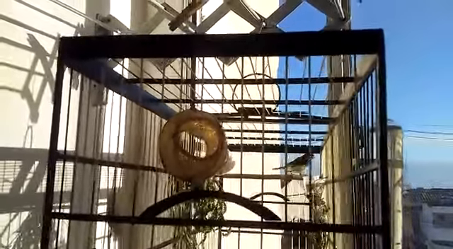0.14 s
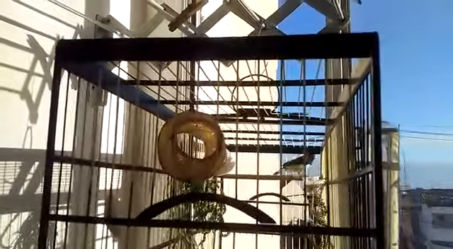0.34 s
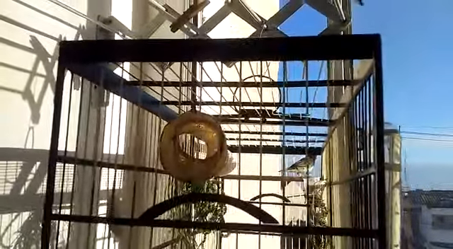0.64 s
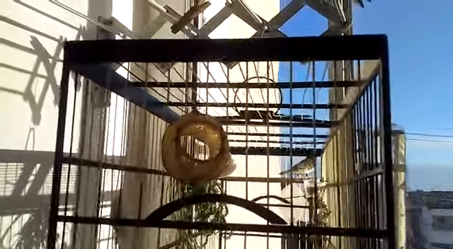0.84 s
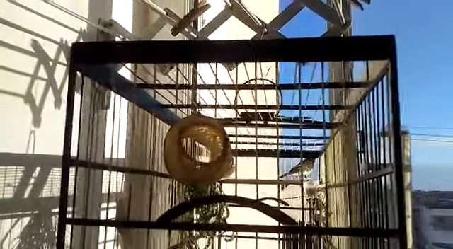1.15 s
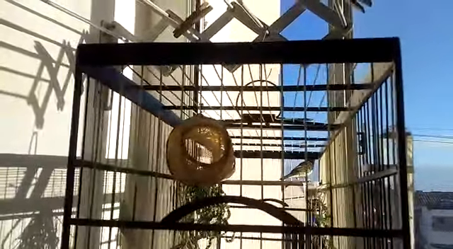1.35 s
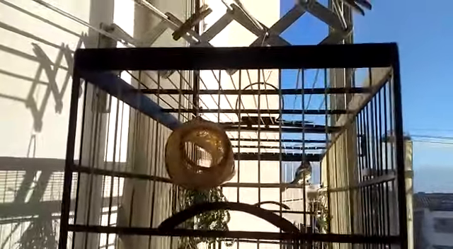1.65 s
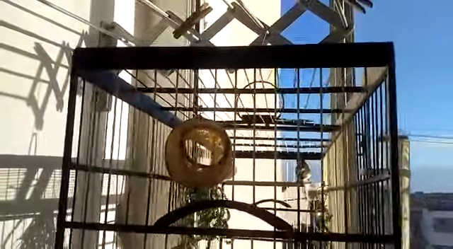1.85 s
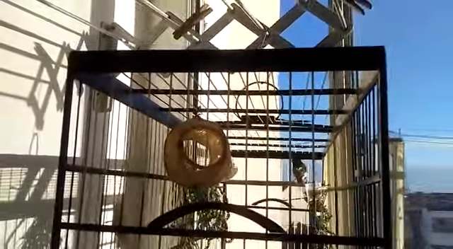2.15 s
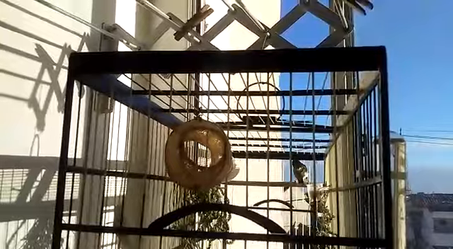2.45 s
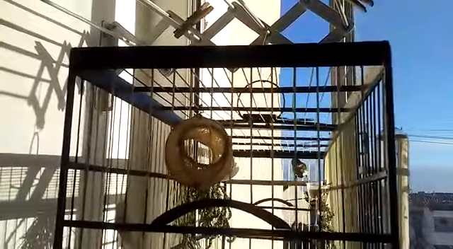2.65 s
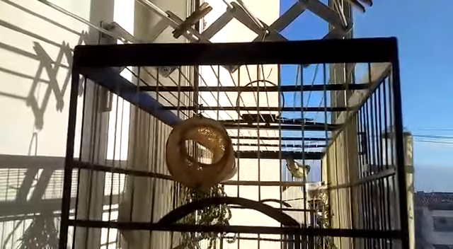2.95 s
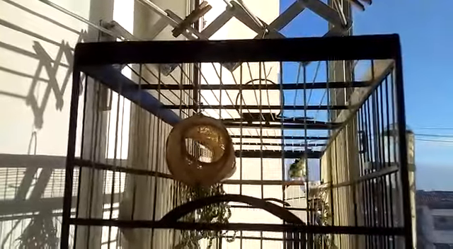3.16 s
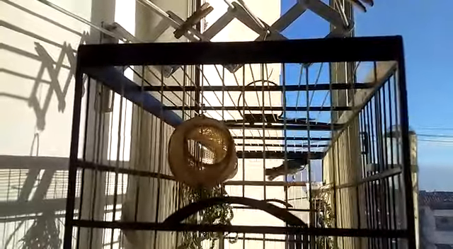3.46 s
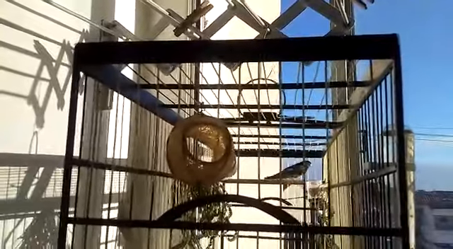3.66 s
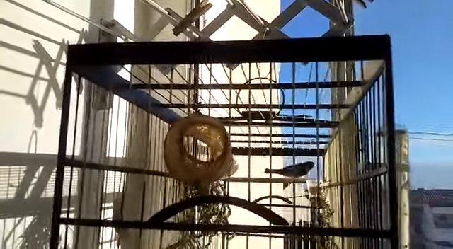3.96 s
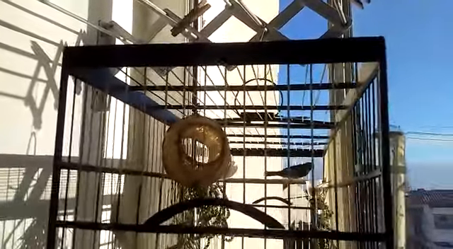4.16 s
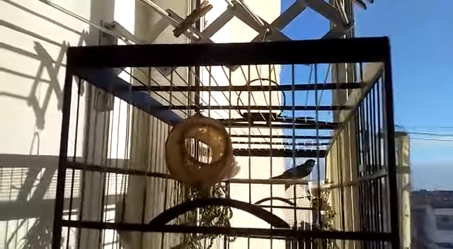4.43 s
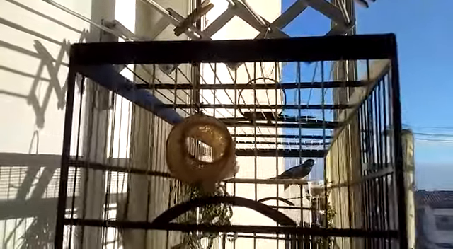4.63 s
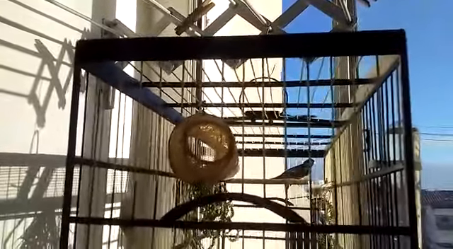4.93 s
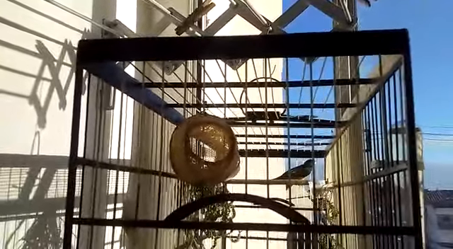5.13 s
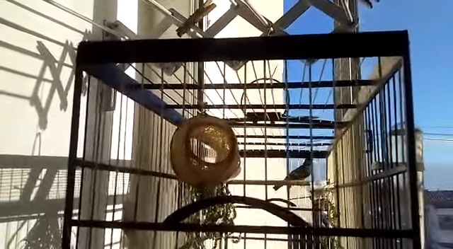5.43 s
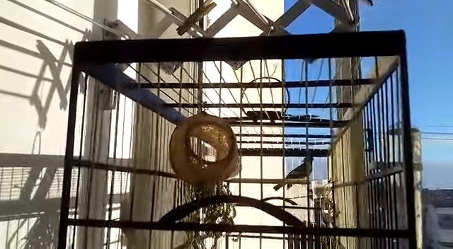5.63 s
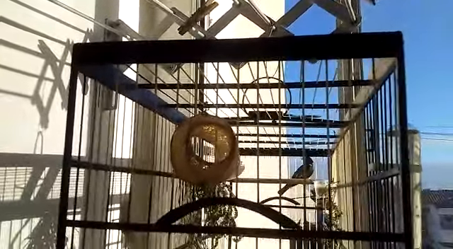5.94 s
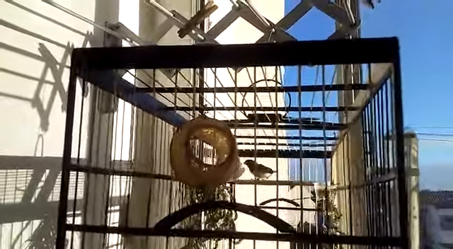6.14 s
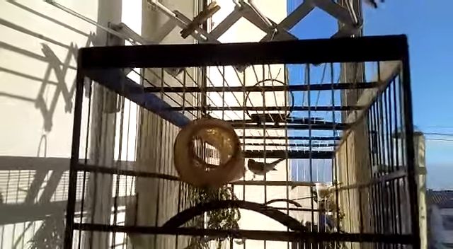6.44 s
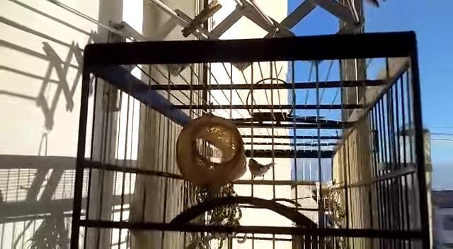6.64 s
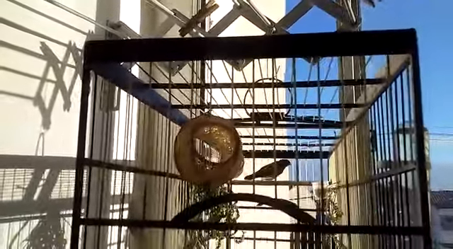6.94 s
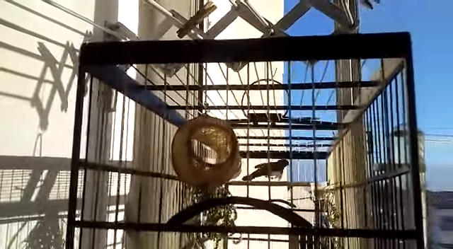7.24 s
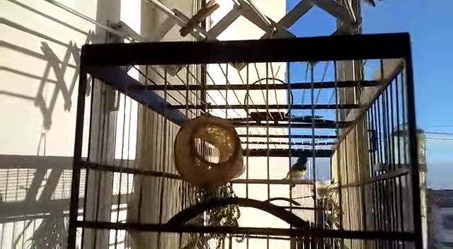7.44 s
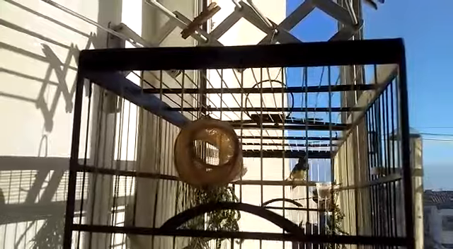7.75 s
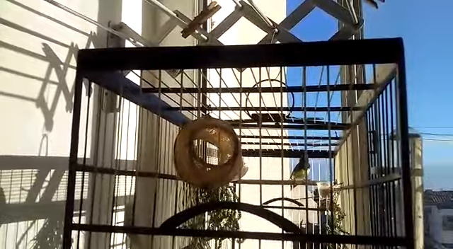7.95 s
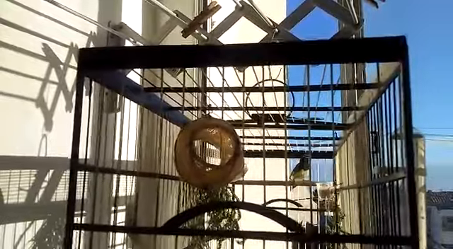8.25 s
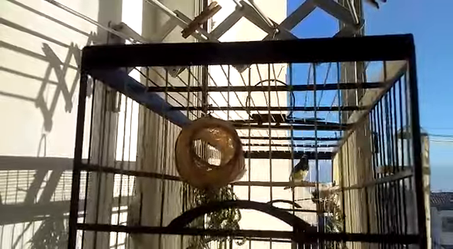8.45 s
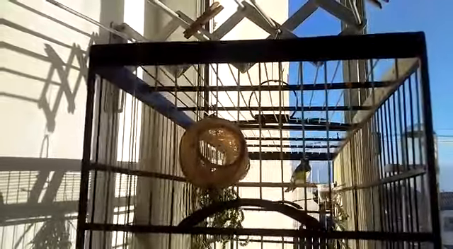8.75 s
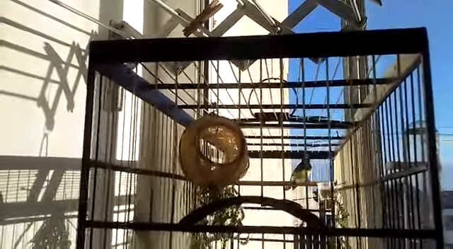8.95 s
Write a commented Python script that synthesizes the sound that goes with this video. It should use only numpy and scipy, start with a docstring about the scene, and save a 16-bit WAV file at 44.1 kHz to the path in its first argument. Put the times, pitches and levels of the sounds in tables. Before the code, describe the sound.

A small caged bird sings two loud, high, buzzy whistled phrases close by, and a distant bird answers over low town rumble.

```python
"""Caged bird on a town balcony.

A small bird sings two loud, close phrases with its syrinx: buzzes that clear into falling whistles,
the second phrase ending in a rasp and three tumbling cascades. A far bird answers, echoing off houses.
Behind them: town rumble and traffic, a machine's hum and whine, a motor revving, dull knocks and
three hoarse woofs. Claws and beak tick on the cage wire."""
import sys
import numpy as np
from scipy import signal
from scipy.fft import rfft, irfft, next_fast_len
from scipy.io import wavfile
from scipy.ndimage import uniform_filter1d, minimum_filter1d

SR = 44100
rng = np.random.default_rng(int(sys.argv[2]) if len(sys.argv) > 2 else 0)


def pcm_store(signal):
    """Save signal as 16-bit PCM."""
    levels = np.round(np.clip(np.atleast_2d(signal), -1, 1) * 32767)
    wavfile.write(sys.argv[1], SR, levels.astype(np.int16).T)


N = 400869
TIME_S = np.arange(N) / SR
EDGE_HZ = 15750

# Slur kinds: length_s, buzz_end_s, glide_start_s, glide_end_s, swell_at_s, attack_s, release_s,
# from_hz, to_hz, buzz_centre_hz, buzz_depth_hz, buzz_rate_hz
SOFT_SLUR = (.184, .06, .06, .17, .115, 0.029, .022, 4410, 3830, 4130, 820, 94)
LOW_SLUR = (0.19, .063, .055, .184, .11, 0.018, 0.023, 4520, 3750, 4360, 740, 110)
HIGH_SLUR = (0.19, 0.078, .05, .178, 0.074, 0.016, 0.02, 5040, 4360, 5470, 680, 134)
RASP = (.18, .058, 0.059, 0.12, 0.049, 0.025, 0.055, 4600, 4360, 4710, 1330, 95.5)
THIN_SLUR = (0.19, .07, 0.066, 0.11, 0.072, .014, 0.031, 4700, 5500, 5520, 650, 136)
SHORT_LOW_SLUR = (.16, .06, .04, .095, 0.0736, .014, 0.041, 5100, 3790, 4330, 250, 110)
SHORT_HIGH_SLUR = (0.12, .03, 0.011, 0.055, 0.052, 0.015, 0.052, 5150, 4630, 5060, 230, 137)
# Run kinds, one note a row: start_s, length_s, crest_at_s, loudest_at_s, first_hz, crest_hz, last_hz,
# first_db, loudest_db, buzz_depth_hz
CASCADE = [(0, .072, .02, 0.054, 6075, 7125, 5500, -17, -1, 199),
           (0.068, .027, .014, 0.01695, 4166, 4760, 4515, -15.5, -3, 257),
           (.092, .073, .017, .02, 3500, 4030, 2975, -17.5, -8, 50)]
STEEP_CASCADE = [(0, 0.057, 0.00196, 0.047, 8200, 8270, 5600, -3, 9, 150),
                 (.06, .04, 0.0042, 0.013, 4780, 4900, 4140, 3, 5.5, 450),
                 (.092, .08, .012, 0.012, 3470, 3594, 2850, -15, 0.96, 150)]
WARBLE = [(0, 0.068, 0.046, 0.035, 2845, 3090, 2950, -3, 4.5, 170),
          (.06, 0.072, .02, .02, 3940, 4083, 3924, -2, 7.5, 70),
          (.13, .04, 0.0016, .005, 3800, 3850, 3100, -2, 0, 150)]
# Reverb decay: freq_hz, t60_s
BALCONY_T60 = [(300, 0.57), (3500, 0.36), (6000, 0.43), (14000, 0.253)]
STREET_T60 = [(300, 1), (3500, 1.0), (6000, 1), (10000, .6)]


def gain_of(db):
    """Decibels to amplitude."""
    return 10 ** (np.asarray(db) / 20)


def unit_rms(x):
    """Scale to rms 1."""
    return x / np.sqrt(np.mean(x ** 2) + 1e-20)


def ease(u):
    """Smooth step over u = 0..1."""
    return np.sin(np.pi / 2 * np.clip(u, 0, 1)) ** 2


def at_freq(points, hz):
    """Interpolate a table over log frequency."""
    freq_hz, value = np.transpose(points)
    return np.interp(np.log(hz + 1), np.log(freq_hz + 1), value)


def over_time(points):
    """Interpolate a table over the scene's time."""
    return np.interp(TIME_S, *np.transpose(points))


def add(mix, start_s, sound):
    """Mix a sound in at start_s."""
    part = mix[max(0, round(start_s * SR)):][:len(sound)]
    part += sound[:len(part)]


def coloured(x, spectrum):
    """Filter by rows of freq_hz, gain_db; rms 1."""
    size = next_fast_len(len(x))
    gain = gain_of(at_freq(spectrum, np.fft.rfftfreq(size, 1 / SR)))
    return unit_rms(irfft(rfft(x, size) * gain, size)[:len(x)])


def noise(size, spectrum):
    """Coloured noise; rms 1."""
    return coloured(rng.standard_normal(size), spectrum)


def filtered(x, kind, hz, order):
    """Butterworth filter."""
    return signal.sosfilt(signal.butter(order, hz, kind, fs=SR, output="sos"), x)


def drift(size, rate_hz):
    """Smooth random wander; rms about 1."""
    position = np.arange(size) * rate_hz / SR
    return np.interp(position, np.arange(8192), rng.standard_normal(8192)) * np.sqrt(3 / 2)


def narrow_noise(hz, width_hz):
    """Noise band round a steady or moving frequency; rms about 1."""
    envelope = drift(N, width_hz) + 1j * drift(N, width_hz)
    return (envelope * np.exp(2j * np.pi * np.cumsum(hz * np.ones(N)) / SR)).real


def reverb(x, t60_table, rise_s):
    """Sparse reflections of random sign that build up, then die band by band."""
    taps = rng.choice([-1., 1.], SR) * (rng.random(SR) < .1)
    hz, t, bands = signal.stft(taps, SR, nperseg=256)
    decay = gain_of(-60 * t / at_freq(t60_table, hz)[:, None])
    tail = signal.istft(bands * decay, SR, nperseg=256)[1]
    tail *= 1 - np.exp(-(np.arange(len(tail)) / SR / rise_s) ** 2)
    return signal.oaconvolve(x, tail / np.linalg.norm(tail))[:N]


def wash(level_db=-50):
    """Even background noise with broad bands of hiss."""
    spectrum = [(15, -42.5), (25, -7), (64, -4.5), (199, -18.5), (240, -17), (322, -25), (349, -22),
                (496, -26), (805, -27), (1080, -31), (1380, -31.5), (3830, -40), (5160, -38.5), (7310, -44),
                (15500, -48)]  # town noise: freq_hz, gain_db
    hiss_bands = [(850, 300, 1), (1831, 570, 2.5), (6190, 900, 4.5), (9500, 2100, 4)]  # spectral humps: centre_hz, width_hz, boost_db
    hz = np.geomspace(20, 20000, 300)
    hiss_db = sum(db * np.exp(-2 * ((hz - centre) / width) ** 2) for centre, width, db in hiss_bands)
    colour_db = at_freq(spectrum, hz) + hiss_db
    return noise(N, np.c_[hz, colour_db]) * gain_of(level_db + .38 * drift(N, 9.1))


def rumble(trim_db=-2, lumps_db=2, boom_trim_db=-3):
    """Lumpy low noise that swells into brief booms."""
    levels = [(0, -46.5), (1.5, -40.5), (2.0, -49), (2.6, -62), (3.1, -44.5), (3.9, -57.5), (4.6, -48),
              (6.5, -43.5), (7.4, -35.5), (7.9, -36.5), (8.6, -54.5), (9.09, -41)]  # rumble contour: time_s, level_db
    booms = [(0.872, 0.12, -45), (1.68, 0.13, -38.5), (4.821, 0.12, -32.5), (5.34, 0.16, -40.5),
             (6.748, 0.065, -36)]  # low swells: centre_s, length_s, level_db
    low = noise(N, [(22, -28), (42, -7.5), (65, 8.5), (100, -12), (200, -25), (600, -57)])
    swells = sum(gain_of(db) * np.exp(-(2 * (TIME_S - s) / length_s) ** 2) for s, length_s, db in booms)
    lumps = gain_of(over_time(levels) + trim_db + lumps_db * drift(N, 16))
    return low * (lumps + gain_of(boom_trim_db) * swells)


def traffic(trim_db=-5, patches_db=3):
    """Swells of traffic that come and go band by band."""
    levels = [(0, -65.5), (3.7, -68.5), (3.95, -60), (4.5, -59), (5.2, -68.5), (5.8, -69), (6.7, -60),
              (7.3, -60.5), (8, -60), (9.09, -57.5)]  # traffic contour: time_s, level_db
    bands = [(620, -2.5), (780, .5), (980, 0), (1300, -7)]
    roar = sum(narrow_noise(hz, hz / 2) * gain_of(db + patches_db * drift(N, 12)) for hz, db in bands)
    return roar * gain_of(over_time(levels) + trim_db)


def town():
    """Wash, rumble and traffic; the small microphone loses the deepest bass."""
    return filtered(wash() + rumble() + traffic(), "highpass", 36, order=6)


def machine_hum(trim_db=-2, waver_hz=2.5, waver_db=1.8):
    """Low machine tones that waver in pitch and level."""
    tones = [(59.2, -57.5), (177.6, -64), (242.2, -66), (355.3, -63), (414.5, -65.5)]  # hum lines: freq_hz, level_db
    out = np.zeros(N)
    for hz, db in tones:
        phase = 2 * np.pi * np.cumsum(hz + waver_hz * drift(N, 20)) / SR
        out += np.sqrt(2) * gain_of(db + trim_db + waver_db * drift(N, 9)) * np.sin(phase)
    return out


def machine_whine(trim_db=-2, whistle_db=-74):
    """The machine's restless, fuzzy whine and faint steady whistle."""
    levels = [(0.0, -73), (0.35, -54), (0.58, -71), (1.27, -50), (1.34, -64), (2.05, -62), (2.08, -53.5),
              (2.33, -75), (2.91, -58.5), (3.69, -72), (3.82, -52), (4.05, -67), (5.14, -56.5),
              (5.26, -74.5), (5.85, -57), (5.95, -74), (6.02, -63), (9.09, -66)]  # whine contour: time_s, level_db
    whine = narrow_noise(808, 45) * gain_of(over_time(levels) + trim_db)
    return whine + gain_of(whistle_db) * narrow_noise(1836, 40)


def far_motor(trim_db=-1):
    """A motor speeds up once: a rising band of noise."""
    rev = [(3.721, 780, -78), (3.81, 830, -68), (3.901, 1045, -63), (3.96, 1235, -64), (4.04, 1220, -61.5),
           (4.201, 1245, -70), (4.351, 1200, -87)]  # rev contour: time_s, pitch_hz, level_db
    time_s, pitch_hz, level_db = np.transpose(rev)
    envelope = gain_of(np.interp(TIME_S, time_s, level_db, left=-120, right=-120) + trim_db)
    return narrow_noise(np.interp(TIME_S, time_s, pitch_hz), 42) * envelope


def street_knocks(t60_s=.14, trim_db=-4):
    """Dull knocks, each one broad resonance, with a short echo."""
    knocks = [(0.321, -45.5, 1380), (0.323, -39.5, 305), (1.17, -49, 2020), (3.955, -44.5, 980)]  # impacts: start_s, level_db, resonance_hz
    out, t = np.zeros(N), np.arange(8192) / SR
    for start_s, db, hz in knocks:
        ring = noise(len(t), [(hz / 2, -12), (hz, 0), (hz * 1.3, -18), (15000, -38)])
        add(out, start_s, gain_of(db + trim_db - 60 * t / t60_s) * ring)
    return .8 * out + reverb(out, BALCONY_T60, rise_s=.025)


def far_dog(hoarseness=.75, street_db=-8):
    """A big dog: breath noise and vocal pulses on a pitch arch, treble lost on the way."""
    woofs = [(3.147, 0.084, -37, 123.6), (3.577, 0.091, -39.5, 118.3), (3.969, 0.073, -44, 112.7)]  # barks: start_s, length_s, level_db, nominal_pitch_hz
    muzzle = [(80, -34.5), (170, 1.5), (230, 5), (320, -3), (440, -1), (560, -23), (750, -26), (1200, -55),
              (4000, -80)]  # bark spectrum: freq_hz, gain_db
    out = np.zeros(N)
    for start_s, length_s, db, hz in woofs:
        swell = np.sin(np.linspace(0, np.pi, int(length_s * SR)))
        phase = 2 * np.pi * np.cumsum(hz * (.73 + .197 * swell)) / SR
        pulses = sum(np.cos(k * phase) for k in range(1, 9))
        voice = (1 - hoarseness) * coloured(pulses, muzzle) + hoarseness * noise(len(swell), muzzle)
        add(out, start_s, gain_of(db) * unit_rms(voice * swell))
    return out + gain_of(street_db) * reverb(out, STREET_T60, rise_s=.0098)


def cage_ticks(t60_s=.073, trim_db=-3, ring_db=-16, ring_t60_s=.09, balcony_db=-8):
    """Claws and beak tap the cage; the wire rings faintly."""
    taps = [(3.464, -43, 14000), (6.0607, -31, 14000), (6.3, -45, 15000), (6.8844, -38, 5580),
            (6.9379, -38, 13000), (7.002, -40, 8960), (7.3603, -37, 7000)]  # taps on the wire: start_s, level_db, lowpass_hz
    wire = [(1180, -49.5), (2000, -20), (2820, -4), (3340, -13), (4400, 2), (6470, -0.5), (7230, -6),
            (8290, -4), (15500, -2)]  # wire spectrum: freq_hz, gain_db
    out, t = np.zeros(N), np.arange(4096) / SR
    decay = gain_of(-60 * t / t60_s) + gain_of(ring_db - 60 * t / ring_t60_s)
    for start_s, db, lowpass_hz in taps:
        tick = filtered(noise(len(t), wire), "lowpass", lowpass_hz, order=2) * decay
        add(out, start_s, gain_of(db + trim_db) * tick / abs(tick).max())
    return out + gain_of(balcony_db) * reverb(out, BALCONY_T60, rise_s=.008)


def syrinx(pitch_hz, level_db, depth_hz, rate_hz, air_db=-28, jitter=.0028, partial_step_db=-15):
    """A nearly pure whistle; in a buzz both sides of the syrinx swing in pitch and beat together."""
    overtones = [(6000, -47.5), (8000, -47.5), (10000, -50.5), (11500, -34), (14000, -28), (16000, -32)]  # overtone strength: freq_hz, gain_db
    # Rushing air: freq_hz, gain_db
    air_spectrum = [(2300, -38), (3300, 1.5), (6300, 7), (7400, -2.5), (9300, 2.5), (10600, -5.5),
                    (13300, -4.5), (15500, -17.5)]
    size = len(pitch_hz)
    cycle = 2 * np.pi * np.cumsum(rate_hz * (1 + .12 * drift(size, 200))) / SR
    buzzing = depth_hz / (depth_hz + 300)
    tone = np.zeros(size)
    for side_gain, lag in ((1, 0), (.59 * buzzing, np.pi / 2)):
        swing = .62 * np.sin(cycle - lag) + .15 * np.sin(2 * (cycle - lag)) + .25 * drift(size, 1100)
        hz = pitch_hz * (1 + jitter * drift(size, 900)) + depth_hz * swing
        phase = 2 * np.pi * np.cumsum(hz) / SR
        tone += side_gain * np.sin(phase)
        for k in range(2, 5):
            partial_db = at_freq(overtones, k * hz) + partial_step_db * (k - 2.5)
            tone += side_gain * gain_of(partial_db) * (k * hz < SR / 2) * np.sin(k * phase)
    # The harder the buzz is driven, the more air rushes through.
    tone += gain_of(air_db + .2 * level_db) * buzzing * noise(size, air_spectrum)
    throb = 1 - .85 * buzzing * np.cos(cycle)
    return np.sqrt(2) * tone * throb * gain_of(level_db)


def slur(kind, buzz_db, whistle_db, pitch_ratio, onset_s=.011, clearing_s=.016, swell_s=.018):
    """A buzz that clears into a gliding whistle."""
    (length_s, buzz_end_s, glide_start_s, glide_end_s, swell_at_s, attack_s, release_s,
     from_hz, to_hz, centre_hz, depth_hz, rate_hz) = kind
    t = np.arange(0, length_s, 1 / SR)
    buzzing = ease(.5 + (buzz_end_s - t) / clearing_s)
    swing_hz = depth_hz * ease(t / onset_s) * buzzing
    glide_hz = from_hz + (to_hz - from_hz) * ease((t - glide_start_s) / (glide_end_s - glide_start_s))
    glide_hz *= 1 + .007 * drift(len(t), 110)
    pitch_hz = pitch_ratio * (glide_hz + (centre_hz - glide_hz) * buzzing)
    db = buzz_db + (whistle_db - buzz_db) * ease(.5 + (t - swell_at_s) / swell_s)
    db -= 4.5 * np.exp(-((t - swell_at_s) / .007) ** 2)  # the voice catches
    envelope = np.minimum(t / attack_s, 1) * ease((length_s - t) / release_s)
    return envelope * syrinx(pitch_hz, db, swing_hz, rate_hz)


def arched_note(note, level_db, pitch_ratio, rate_hz, sink_db=-9.5, fade_s=.0036, fall_skew=.78):
    """One lightly buzzing note of a run: up to its crest and down again."""
    length_s, crest_at_s, loudest_at_s, first_hz, crest_hz, last_hz, first_db, loudest_db, depth_hz = note
    t = np.arange(0, length_s, 1 / SR)
    to_climb = np.maximum(1 - t / crest_at_s, 0) ** 2
    fallen = ease(np.maximum((t - crest_at_s) / (length_s - crest_at_s), 0) ** fall_skew)
    hz = crest_hz + (first_hz - crest_hz) * to_climb + (last_hz - crest_hz) * fallen
    db = level_db + first_db + (loudest_db - first_db) * ease(t / loudest_at_s) ** 2
    db += sink_db * np.maximum(t - loudest_at_s, 0) / (length_s - loudest_at_s)
    envelope = ease(np.minimum(t, length_s - t) / fade_s)
    return envelope * syrinx(pitch_ratio * hz, db, depth_hz, rate_hz, air_db=-20.5)


def sing(slurs, runs):
    """Syllables strung into phrases; so small a throat radiates little below its lowest note."""
    out = np.zeros(N)
    for start_s, *settings in slurs:
        add(out, start_s, slur(*settings))
    for start_s, kind, *settings in runs:
        for offset_s, *note in kind:
            add(out, start_s + offset_s, arched_note(note, *settings))
    return filtered(out, "highpass", 2800, order=12)


def distant_bird():
    """The answer, heard mostly off the house fronts, its overtones lost on the way."""
    slurs = [(0.0, THIN_SLUR, -63.5, -80, 1.08), (.5, THIN_SLUR, -67, -72, .96),
             (1.0, THIN_SLUR, -67, -76, .9), (1.22, THIN_SLUR, -70, -69, .9),
             (1.48, SHORT_LOW_SLUR, -57, -64, 0.85), (3.72, LOW_SLUR, -56.5, -54.5, 0.94),
             (4.125, SHORT_LOW_SLUR, -50, -44, 0.98), (4.32, SHORT_HIGH_SLUR, -40.5, -38.5, 1.0),
             (4.812, THIN_SLUR, -41.5, -38.5, 1.0)]  # syllables: start_s, kind, buzz_db, whistle_db, pitch_ratio
    runs = [(4.47, WARBLE, -47.5, 0.98, 69), (4.67, WARBLE, -47, 1.0, 69.6),
            (4.99, STEEP_CASCADE, -45, 1.0, 169.6), (5.19, STEEP_CASCADE, -44.5, 1.01, 164.4)]  # note runs: start_s, kind, level_db, pitch_ratio, buzz_rate_hz
    song = filtered(sing(slurs, runs), "lowpass", 8500, order=4)
    return .16 * song + reverb(song, STREET_T60, rise_s=.016)


def caged_bird(balcony_db=-9, street_db=-29):
    """The near song, reflected by walls, balcony and street."""
    slurs = [(1.697, SOFT_SLUR, -18, -10, 1), (2.102, LOW_SLUR, -13, -8.5, 0.99),
             (2.361, HIGH_SLUR, -11, -6.5, 0.98), (7.428, SOFT_SLUR, -20, -12.5, .98),
             (7.824, LOW_SLUR, -12, -8, 0.98), (8.068, HIGH_SLUR, -8.5, -3.5, 0.99),
             (8.311, RASP, -12.5, -5, 0.99)]  # syllables: start_s, kind, buzz_db, whistle_db, pitch_ratio
    runs = [(8.491, CASCADE, 0.5, .99, 168.8), (8.695, CASCADE, -0.5, 0.99, 171),
            (8.903, CASCADE, -2, 1.017, 170)]  # note runs: start_s, kind, level_db, pitch_ratio, buzz_rate_hz
    walls = [(.0023, 0.24), (.0041, -0.22), (.0078, 0.39), (0.0117, 0.26), (0.0178, -.2), (.029, 0.21)]  # near reflections: delay_s, gain
    song = sing(slurs, runs)
    near = song.copy()
    for delay_s, gain in walls:
        add(near, delay_s, gain * song)
    balcony = gain_of(balcony_db) * reverb(song, BALCONY_T60, rise_s=.017)
    street = gain_of(street_db) * reverb(song, STREET_T60, rise_s=.014)
    return near + balcony + street


def scene():
    """All sources, mono."""
    events = caged_bird() + distant_bird() + far_dog() + cage_ticks() + street_knocks()
    background = machine_hum() + machine_whine() + far_motor() + town()
    return (events + background)[None]


def record(dry, ceiling=.98, release_db_per_s=600, crackle_db=6):
    """A limiter snaps down just ahead of peaks over the ceiling, with a small crackle; then a low-pass."""
    x = dry[0]
    over_db = 20 * np.log10(np.maximum(abs(x) / ceiling, 1))
    recovery_db = release_db_per_s * TIME_S
    held_db = np.maximum.accumulate(over_db + recovery_db) - recovery_db
    gain = gain_of(-held_db)
    snaps = np.maximum(-np.diff(gain, prepend=1), 0) * np.sign(x)
    crackle = filtered(snaps, "bandpass", [1100, 4500], order=2)
    smooth_gain = uniform_filter1d(minimum_filter1d(gain, size=11), size=11)
    limited = x * smooth_gain + gain_of(crackle_db) * crackle
    lowpass = signal.firwin(511, EDGE_HZ, window=("kaiser", 9), fs=SR)
    return signal.oaconvolve(limited, lowpass, "same")[None]


dry = scene()
out = record(dry)
pcm_store(out)
```